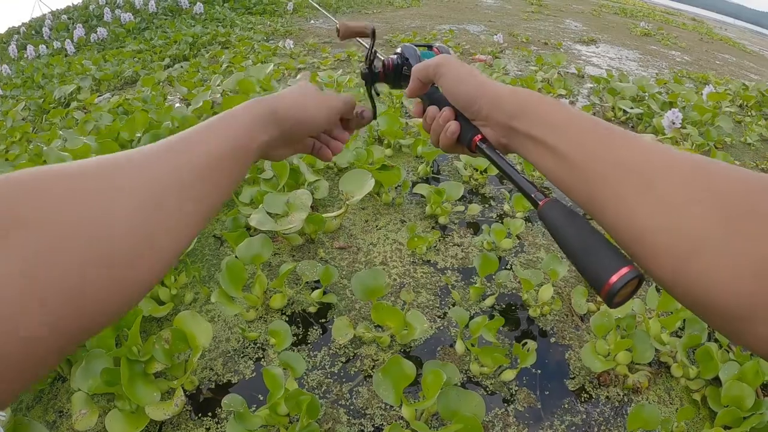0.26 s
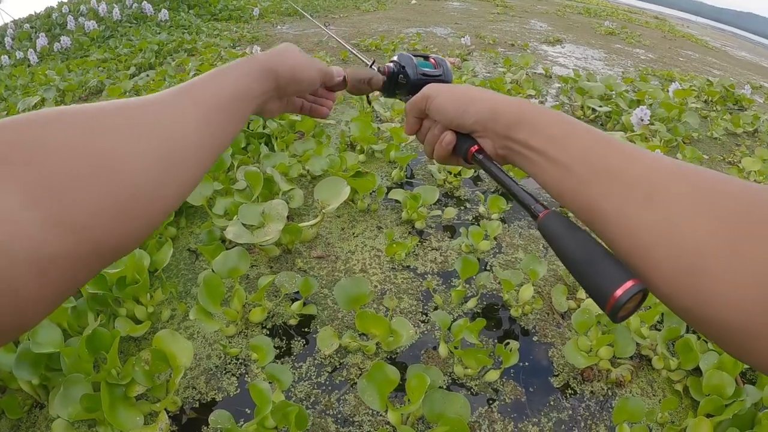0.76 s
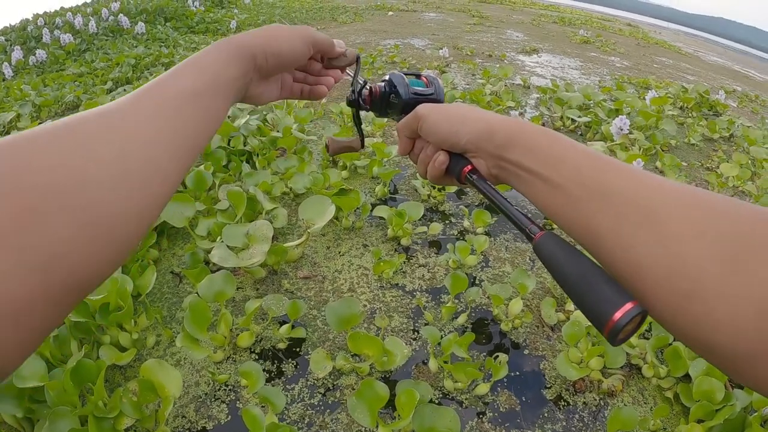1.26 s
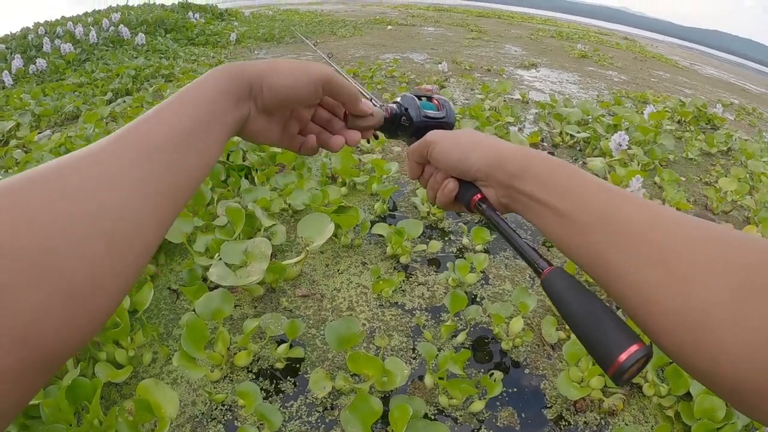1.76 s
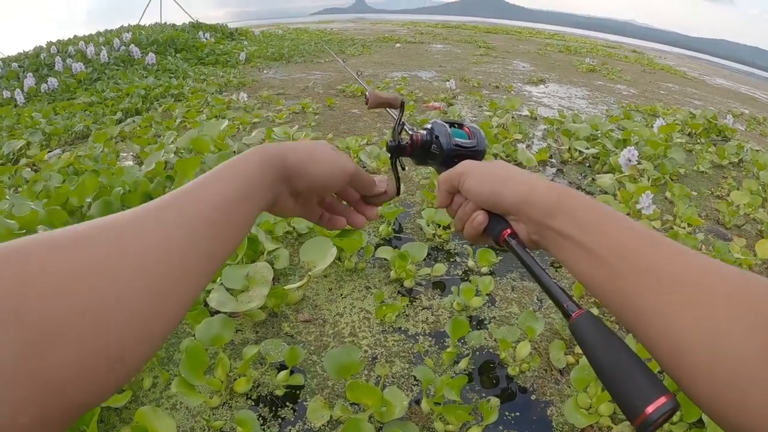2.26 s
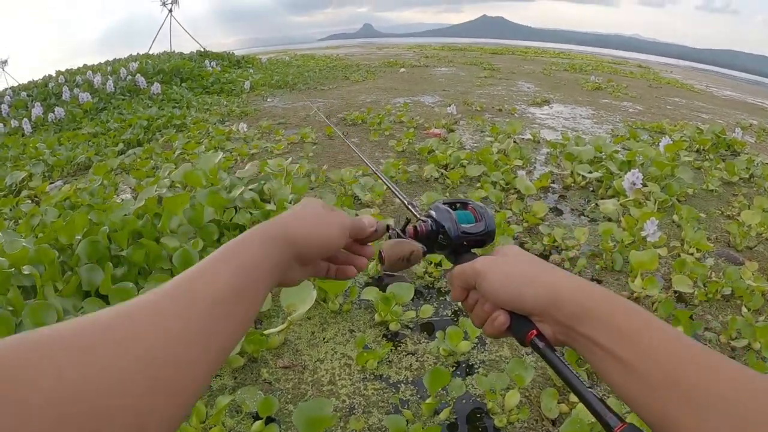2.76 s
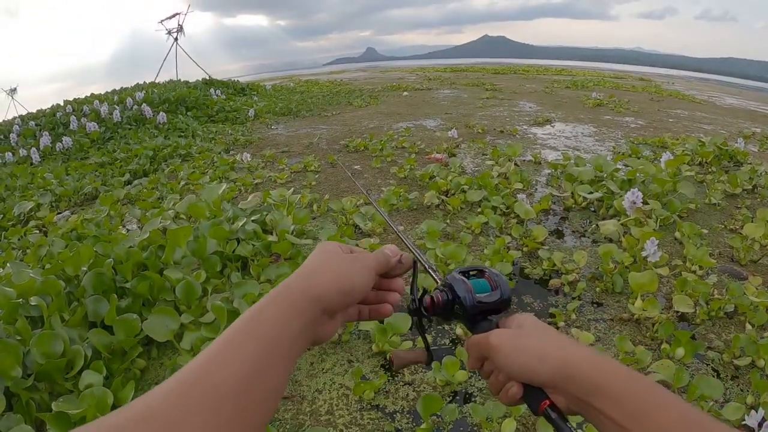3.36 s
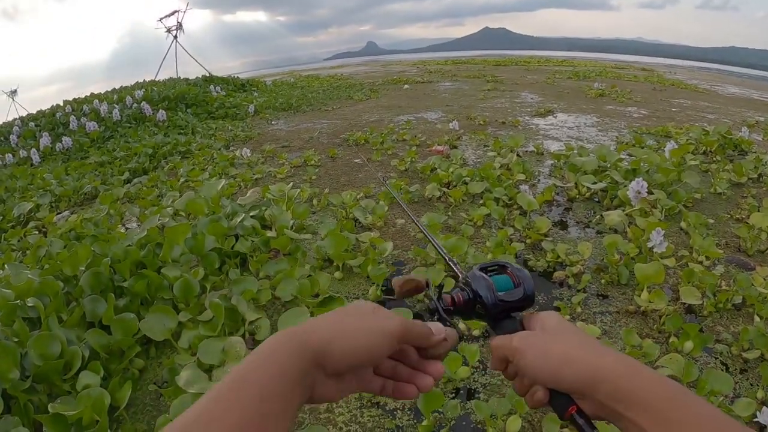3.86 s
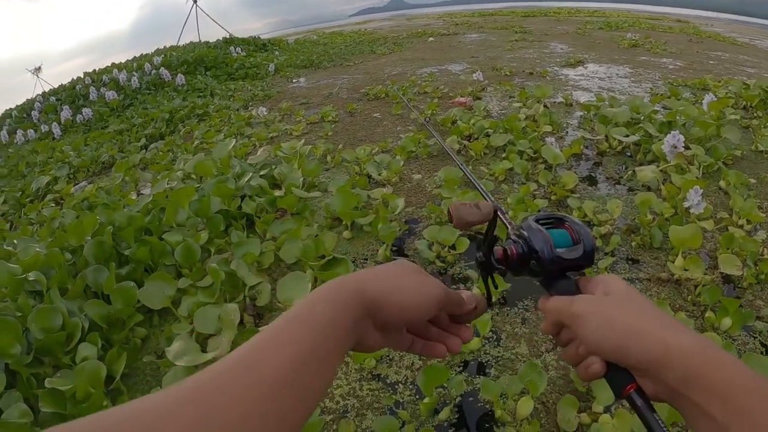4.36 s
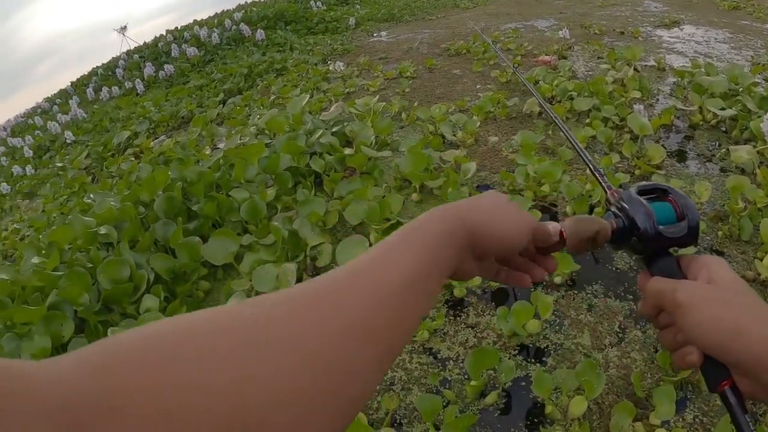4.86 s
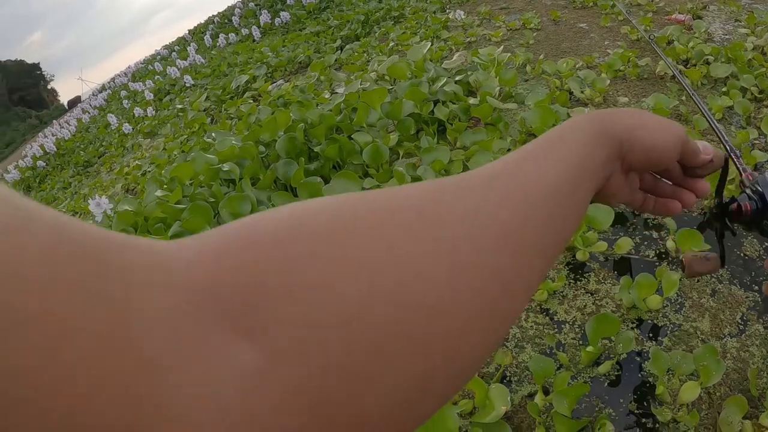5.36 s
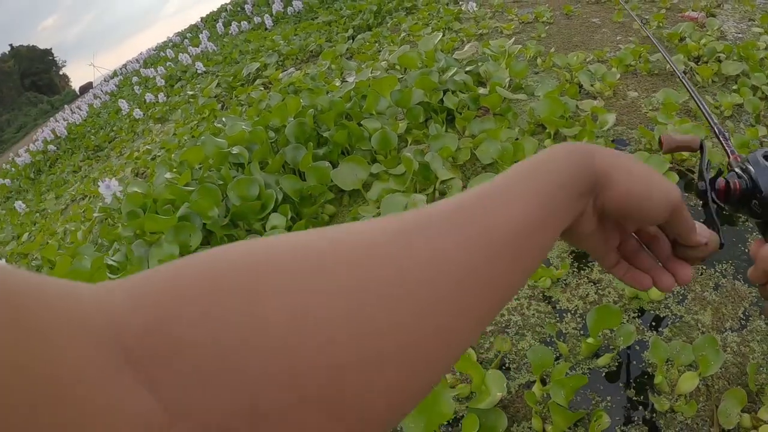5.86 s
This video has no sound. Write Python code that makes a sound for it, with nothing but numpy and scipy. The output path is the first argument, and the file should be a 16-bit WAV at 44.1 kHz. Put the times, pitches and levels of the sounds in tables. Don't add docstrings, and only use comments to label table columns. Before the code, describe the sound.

A weedy lake shore in open air, heard in stereo from a small chest-worn camera. Throughout, a shimmering cricket chorus around 7 to 8 kHz leans left, with a lower insect trill, a faint airy hiss, a far engine's low drone and light breeze. From 0 to 1.6 s hoarse birds chatter, with sharp brief calls near 0.7, 1.15 and 1.5 s. Sparse reel ticks and tiny drips begin around 0.5 s. More bird chatter fills 2 to 3 s, as a closer cricket pulses more clearly. The chorus swells briefly at 3.25 s; thin whistles slide downward on the right from 3.4 to 4.4 s. After 4.3 s close wet snaps, reel clicks, line scrapes and leaf and cloth rustle come thickly, easing briefly around 5.3 s, then peaking with plinking drops near 5.9 to 6.1 s as crickets rise.

```python
import sys
import numpy as np
from scipy import signal
from scipy.fft import rfft, irfft, next_fast_len
from scipy.io import wavfile
from scipy.ndimage import uniform_filter1d

SR = 44100
rng = np.random.default_rng(int(sys.argv[2]) if len(sys.argv) > 2 else 0)


def store_wav(level_fs):
    pcm = np.round(np.clip(np.atleast_2d(level_fs), -1, 1) * 32767)
    wavfile.write(sys.argv[1], SR, pcm.T.astype(np.int16))


def magnitude_from_level(level_db):
    exponent = np.asarray(level_db, float) / 20
    return 10 ** exponent


N = 269936


def evened(x):
    return x / np.sqrt(np.mean(x ** 2) + 1e-20)


def read(points, hz):
    f, value = np.transpose(points)
    return np.interp(np.log(hz + 1), np.log(f + 1), value)


def curve(rows):
    s, *columns = np.transpose(rows)
    return [np.interp(np.arange(N) / SR, s, c) for c in columns]


def add(mix, s, sound):
    part = mix[..., round(s * SR):][..., :sound.shape[-1]]
    part += sound[..., :part.shape[-1]]


def placed(x, pan_db):
    return x * magnitude_from_level(np.array([[pan_db / 2], [-pan_db / 2]]))


def drift(rate_hz, length):
    steps = int(length / SR * rate_hz) + 3
    return np.interp(np.arange(length) / SR * rate_hz, np.arange(steps), rng.standard_normal(steps))


def ring(x, hz, width):
    r = np.exp(-np.pi * width / SR)
    pole = r * np.exp(2j * np.pi * hz / SR)
    return 2 * signal.lfilter([(1 - r) ** 2], [1, -2 * pole, pole ** 2], x).real


def resonate(x, hz, width):
    turn = np.exp(2j * np.pi * np.cumsum(hz * np.ones(len(x))) / SR)
    r = np.exp(-np.pi * width / SR)
    return 2 * (turn * signal.lfilter([(1 - r) ** 2], [1, -2 * r, r * r], x / turn)).real


def outdoors(x, t60, start_s=0.0067):
    t = np.arange(SR // 2) / SR
    taps = rng.choice([-1., 1.], (2, len(t))) * (rng.random((2, len(t))) < .05)
    taps = taps * (t > start_s) * magnitude_from_level(-60 * t / t60)
    return signal.fftconvolve(x[None], taps / np.linalg.norm(taps[0]), axes=1)[:, :N]


# pitch in Hz, left minus right in dB.
NOISE_LEAN = [(60, 2.5), (160, -0.5), (440, -0.5), (1200, 0.5), (3260, 3.5), (8850, -4)]


def hiss(colour, patchy_db, likeness):
    frames, hz = N // 256 + 5, np.fft.rfftfreq(1024, 1 / SR)
    a, b, c, d, patches = rng.standard_normal((frames, 513, 5)).T
    patches = evened(uniform_filter1d(uniform_filter1d(patches, size=12, axis=0), size=10, axis=1))
    same = np.clip(read(likeness, hz), 0, 1)[:, None]
    left = a + 1j * b
    right = same * left + np.sqrt(1 - same ** 2) * (c + 1j * d)
    right = right * magnitude_from_level(-read(NOISE_LEAN, hz))[:, None]
    z = np.array([left, right]) * magnitude_from_level(read(colour, hz)[:, None] + patchy_db * patches)
    return evened(signal.istft(z, nperseg=1024, noverlap=768)[1][:, :N])


def wing(gate, hz, width, strokes_hz):
    stroke = .5 + .5 * np.cos(2 * np.pi * (np.arange(N) * strokes_hz / SR + rng.random()))
    return evened(ring(gate * (0.48 + stroke) * rng.standard_normal(N), hz, width))


# time in seconds, level in dB.
CHORUS_LEVEL = [
    (0, -61),
    (1.1, -60.5),
    (2.3, -59.5),
    (2.9, -59),
    (3.25, -54),
    (3.5, -59.5),
    (5.6, -61),
    (6.12, -54.5),
]
# wing pitch in Hz, ring width in Hz, chirps per second, level in dB,
# left minus right in dB.
CHORUS_SINGERS = [(6760, 210, 4.7, -4.5, 7.5), (6930, 210, 7.9, -3, 18.5), (7103, 130, 5.7, -3.5, 12),
                  (7200, 190, 8.6, -2.5, 11), (7360, 130, 19, -4.5, 16), (7556, 150, 6.8, -3, 11),
                  (7764, 130, 15, -10, 17), (7930, 130, 7.2, -21, -3), (8030, 78, 3.9, -15.5, 9.5)]
# time in seconds, level
# in dB.
MIDDLE_SINGERS_LEVEL = [(0, -1), (3.2, -1), (3.5, -0.5), (6.12, -3)]


def cricket_chorus():
    near, far = np.zeros((2, N)), np.zeros(N)
    middle_db = curve(MIDDLE_SINGERS_LEVEL)[0]
    for hz, width, chirps, db, pan_db in CHORUS_SINGERS:
        beat = np.arange(N) * chirps / SR + rng.random() + 0.23 * drift(1.5, N)
        gate = np.clip(0.52 + 1.2 * np.sin(2 * np.pi * beat), .25, 1)
        fade_db = middle_db * (7080 < hz < 7500)
        level = magnitude_from_level(db + fade_db + 2.24 * drift(1.2, N))
        song = level * wing(gate, hz, width, rng.uniform(110, 145))
        near += placed(song, pan_db)
        far += song
    scale = magnitude_from_level(curve(CHORUS_LEVEL)[0] - 3.5) / np.std(far)
    return scale * (near + magnitude_from_level(-17.5) * outdoors(far, t60=0.29))


# time in seconds, level in dB.
NEAR_CRICKET_LEVEL = [(0, -84), (1.5, -79), (2.2, -69), (3.3, -66.5), (4.2, -65.5), (5.3, -64), (6.12, -86)]


def near_cricket():
    first_s, spacing_s, chirp_s = .045, .1393, .075
    since = (np.arange(N) / SR - first_s) % spacing_s
    gate = np.clip(np.minimum(since, chirp_s - since) / 0.0095, 0, 1)
    song = magnitude_from_level(curve(NEAR_CRICKET_LEVEL)[0] - 2.5) * wing(gate, 7590, 150, 125)
    return placed(song, 16.0) + magnitude_from_level(-6.5) * outdoors(song, t60=0.16)


# time in seconds, level in dB.
LOW_INSECT_LEVEL = [(0, -76), (.5, -74), (1.4, -73), (2.2, -80), (3, -73.5), (4, -81), (6.12, -66)]


def low_insect():
    gate = magnitude_from_level(4.1 * drift(15, N))
    song = wing(gate, 3860, 190, 60) + magnitude_from_level(-1.5) * wing(gate, 3620, 150, 73)
    return placed(magnitude_from_level(curve(LOW_INSECT_LEVEL)[0]) * song, 1.8)


def bird_note(length, level_db, pitches, rough, buzz_hz, wobble_hz, width):
    t = np.arange(0, length, 1 / SR)
    hz = np.interp(t, np.linspace(0, length, len(pitches)), pitches)
    buzz = np.sin(2 * np.pi * buzz_hz * t + 0.49 * drift(55, len(t)))
    clear = np.sin(2 * np.pi * np.cumsum(hz + wobble_hz * buzz) / SR)
    clear = clear * (1 - rough * buzz)
    breath = resonate(rng.standard_normal(len(t)), hz, width)
    voice = (1 - rough) * evened(clear) + rough * evened(breath)
    return magnitude_from_level(level_db) * evened(voice) * signal.windows.tukey(len(t), 0.34)


# start in seconds, length in seconds, level in dB,
# middle pitch in Hz, glide from start to end in Hz.
ARCHED_NOTES = [(.118, 0.071, -57, 2600, 405), (.13, 0.032, -63, 2950, 101),
                (.19, 0.032, -63.5, 2050, -200), (.172, 0.041, -55, 2400, -750),
                (.449, 0.12, -64.5, 2475, -500), (.6, 0.046, -62, 2450, 102), (.635, 0.028, -62, 2900, 102),
                (.655, .028, -61, 3230, 50), (.73, 0.023, -69, 2980, 203), (.81, 0.071, -57, 2446, -360),
                (.885, 0.099, -51.5, 2160, 252), (.893, 0.052, -52.5, 2570, -150),
                (.94, 0.026, -58, 2830, 51), (1.04, .06, -57.5, 2490, 130), (1.24, 0.044, -58, 2434, -150),
                (2.1, 0.1, -57, 2640, 400), (2.145, 0.043, -58.5, 3000, 30), (2.215, 0.057, -55, 2610, 194),
                (2.338, 0.048, -55.5, 2740, -650), (2.375, 0.044, -51, 2970, -150),
                (2.39, 0.042, -54, 2480, 698), (2.555, 0.073, -53, 2757, 101),
                (2.63, 0.068, -56.5, 2740, 300), (2.698, .075, -55, 2590, 298),
                (2.724, 0.02, -54, 3290, 100), (2.79, 0.097, -52.5, 2750, 146), (2.889, .05, -57, 2740, 25),
                (2.94, 0.052, -51, 2785, 253), (3.055, 0.055, -65.5, 2760, 53),
                (3.249, 0.13, -60, 2616, -190), (3.601, 0.07, -63, 2820, 552),
                (4.41, 0.064, -72, 2280, 150), (5.245, .03, -66, 2800, 50), (5.278, 0.043, -64, 3400, -200),
                (5.3, 0.067, -57.5, 2780, -100)]
# start in seconds, length in seconds,
# level in dB, middle pitch in Hz, glide from start to end in Hz.
SCOOPED_NOTES = [(2.03, 0.057, -64, 1440, -48), (2.13, 0.098, -66, 2290, 47),
                 (2.35, 0.058, -57.5, 2150, 50), (2.59, 0.047, -57, 2220, 30), (1.76, 0.16, -65, 2305, 6),
                 (3.43, 0.047, -66, 1367, -510), (3.7, 0.078, -65.5, 1950, -410),
                 (3.98, .1, -60.5, 2167, -92), (4.15, 0.11, -59.5, 1990, -100),
                 (4.335, .085, -53.5, 2120, -150)]
# main note's start in seconds, its length in seconds, level in dB,
# pitch in Hz.
NEAR_CALLS = [
    (0.672, 0.033, -49, 2786),
    (1.149, 0.037, -37, 2797),
    (1.535, .053, -41.5, 2730),
]
MAIN_NOTE_SAG = (39.8, 0, 90)


def reed_notes():
    notes = []
    for rows, bend in ((ARCHED_NOTES, 190.8), (SCOOPED_NOTES, -230)):
        for s, length, db, hz, glide in rows:
            notes.append((s, length, db, (hz - bend - glide / 2, hz, hz - bend + glide / 2)))
    lead_s, tail_s = 0.021, 0.047
    for s, length, db, hz in NEAR_CALLS:
        notes.append((s - lead_s, lead_s, db - 18, (1920, 2120, 2220)))
        notes.append((s, length, db, hz - np.array(MAIN_NOTE_SAG)))
        notes.append((s + 0.85 * length, tail_s, db - 13, (2282, 1990, 1960)))
    return notes


def reed_birds():
    reed = np.zeros(N)
    for s, length, db, pitches in reed_notes():
        rough = np.clip(0.37 + 0.011 * (-39 - db), 0, .9)
        add(reed, s, bird_note(length, db, pitches, rough, buzz_hz=201.2, wobble_hz=75.5, width=340))
    return placed(reed, 5.4) + magnitude_from_level(-6.5) * outdoors(reed, t60=.3)


# start in seconds, level in dB, starting pitch in Hz, length in seconds,
# depth of the fall (1 = the full shape below).
WHISTLES = [
    (3.437, -68, 8750, 0.096, 0.63),
    (3.677, -58.5, 8870, 0.12, 1.02),
    (3.891, -57.5, 8870, 0.1, 1.17),
    (4.085, -58, 9170, .1, 1.5),
    (4.329, -55.5, 8610, 0.13, 0.97),
]
WHISTLE_FALL = (0, 480, 580, 620, 660, 720, 800, 1000)


def falling_whistle():
    thin = np.zeros(N)
    for s, db, hz, length, depth in WHISTLES:
        pitches = hz - depth * np.array(WHISTLE_FALL)
        add(thin, s, bird_note(length, db, pitches, rough=0.3, buzz_hz=92.5, wobble_hz=45, width=240))
    return placed(thin, -4.0) + magnitude_from_level(np.array([[-4], [0.5]])) * outdoors(thin, t60=0.49)


# pitch in Hz, width in Hz, level in dB.
REEL_BODY = [(3570, 2680, -2.5), (4780, 4300, -4), (9200, 4000, -31), (12800, 3000, -25.5)]


def reel_body(bright, dull):
    high = sum(magnitude_from_level(db) * ring(bright, hz, w) for hz, w, db in REEL_BODY)
    near = magnitude_from_level(2.0) * high + magnitude_from_level(6.5) * ring(dull, 1710, 1270)
    return placed(near, 1.8) + magnitude_from_level(-11.5) * outdoors(near, t60=0.017, start_s=0.00047)


# start in seconds, peak in dB, low part in dB against the peak.
REEL_TICKS = [(0.51, -52, -9), (1.1823, -41.5, -18), (1.712, -52, -15), (1.946, -45, -17), (2.214, -40, -4),
              (2.2694, -42.5, -29), (2.5057, -40, -3), (2.696, -58.5, 18), (2.966, -49, -5),
              (3.9797, -42, -10), (4.346, -37.5, 1.5), (4.3672, -35.5, 2), (4.535, -37.5, 0),
              (4.6348, -36, -8), (4.681, -43.5, -14), (4.8, -53, -26), (4.908, -44, -21), (4.942, -40, -20),
              (4.99, -47, 1), (5.027, -45.5, 2), (5.119, -40, 1), (5.241, -42, -11), (5.5045, -42, -23),
              (5.531, -51.5, 13), (5.679, -41, -10), (5.813, -49, -21), (5.8847, -39, 2),
              (5.925, -29.5, -4), (5.976, -56, 15), (6.059, -42, 5)]


def reel_ticks():
    bright, dull, t = np.zeros(N), np.zeros(N), np.arange(2000) / SR
    for s, db, low_db in REEL_TICKS:
        fade_db = 26 * t / 0.014
        burst = rng.standard_normal(2000) * magnitude_from_level(db - fade_db) * np.minimum(t / 0.0005, 1)
        burst[8] += 2.8 * magnitude_from_level(db)
        add(bright, s, burst)
        add(dull, s, magnitude_from_level(low_db) * burst)
    return reel_body(bright, dull)


# middle in seconds, level in dB,
# low part in dB against the level, length in seconds.
LINE_SCRAPES = [(1.593, -54, -23, 0.051), (1.723, -54, -24, 0.04), (2.266, -56, 4.5, 0.044),
                (2.925, -57, -7, 0.072), (3.02, -61.5, 7.5, 0.066), (4.591, -53, -8, 0.096),
                (4.796, -53.5, -7, 0.039), (4.975, -51, -13, 0.042), (5.122, -50.5, 2, 0.054),
                (5.247, -52.5, -2, .05), (5.521, -55, -1, 0.081), (5.691, -47, -15, 0.033),
                (5.836, -47, -18, 0.031), (5.943, -44, -4.5, 0.024)]


def line_scrapes():
    bright, dull = np.zeros(N), np.zeros(N)
    for s, db, low_db, length in LINE_SCRAPES:
        shape = np.hanning(round(1.62 * length * SR))
        burst = rng.standard_normal(len(shape)) * shape * magnitude_from_level(db + 3.5 + 2.9 * drift(285, len(shape)))
        add(bright, s - 0.67 * length, burst)
        add(dull, s - 0.81 * length, magnitude_from_level(low_db) * burst)
    return reel_body(bright, dull)


# start in seconds, peak in dB, ringing pitch in Hz.
CRACKLES = [(4.3193, -58, 802), (4.3195, -31.5, 2320), (4.34, -32, 2550), (4.3457, -45, 2420),
            (4.367, -40, 2040), (4.4016, -43, 2220), (4.434, -45, 2220), (4.4656, -39, 3060),
            (4.487, -41, 2840), (4.5343, -28, 2340), (4.5747, -38, 2800), (4.5842, -35, 2070),
            (4.6181, -39, 3850), (4.6329, -35, 1210), (4.658, -36, 3490), (4.68, -42, 2710),
            (4.7239, -41, 2750), (4.7484, -38.5, 1320), (4.7917, -42, 4390), (4.7917, -42, 4390),
            (4.7917, -38, 4130), (4.8216, -35, 2370), (4.884, -33, 2960), (4.9429, -33, 3900),
            (4.976, -36, 1730), (4.984, -33, 1900), (5.0301, -32, 1220), (5.0344, -30, 2900),
            (5.0646, -44, 6850), (5.0884, -36, 1560), (5.118, -32, 4790), (5.119, -35, 1060),
            (5.1604, -38, 1370), (5.1923, -42, 1610), (5.2098, -37, 1610), (5.2262, -37, 1550),
            (5.2322, -38, 1570), (5.2386, -36, 1570), (5.3135, -50, 2680), (5.3455, -47, 2490),
            (5.4288, -47, 1470), (5.4861, -42, 3530), (5.502, -35, 3840), (5.528, -35, 1930),
            (5.643, -48, 1340), (5.666, -44, 1840), (5.669, -45, 1240), (5.6803, -37, 1700),
            (5.732, -37, 1690), (5.7698, -33, 2050), (5.8079, -43, 2330), (5.8309, -52, 802),
            (5.8309, -36, 3250), (5.854, -37, 2600), (5.8847, -38, 1810), (5.927, -29, 3430),
            (5.9368, -24, 3060), (6.009, -30, 915), (6.0618, -25.5, 1250), (6.1093, -31, 1400)]


def crackles():
    out, t = np.zeros(N), np.arange(600) / SR
    for s, db, hz in CRACKLES:
        snap = np.sin(2 * np.pi * hz * t) + 0.31 * rng.standard_normal(600)
        fade_db = 26 * t * hz / 8.4
        add(out, s, magnitude_from_level(db - 7.5 - fade_db) * snap)
    return placed(out, 2.6) + magnitude_from_level(-11.5) * outdoors(out, t60=0.05, start_s=.001)


# middle in seconds, length in seconds, level in dB, pitch in Hz.
LINE_RUBS = [(4.59, 0.038, -56, 1900), (4.794, 0.022, -52.5, 4100), (5.095, 0.037, -53, 1440),
             (5.122, 0.024, -49.5, 1580), (5.125, 0.037, -58, 3820), (5.118, 0.031, -52, 4900),
             (5.237, 0.037, -57, 1540), (5.248, 0.027, -61, 3900), (5.361, .04, -59.5, 3660),
             (5.435, 0.032, -53, 1790), (5.506, 0.026, -47, 3940), (5.531, 0.027, -51, 1700),
             (5.549, 0.029, -45.5, 3320), (5.69, 0.031, -53, 1700), (5.89, 0.045, -49, 1890),
             (5.938, 0.018, -46.5, 4450), (5.831, 0.023, -52, 2980), (5.712, 0.019, -54.5, 3180),
             (4.48, 0.034, -55, 2920), (4.66, 0.017, -53, 3440), (4.698, .05, -60, 2520)]


def line_rubs():
    out = np.zeros(N)
    for s, length, db, hz in LINE_RUBS:
        shape = np.hanning(round(1.38 * length * SR))
        grit = rng.standard_normal(len(shape)) * magnitude_from_level(4.3 * drift(290, len(shape)))
        add(out, s - 0.69 * length, magnitude_from_level(db) * shape * evened(ring(grit, hz, 0.33 * hz)))
    return placed(out, 2.4) + magnitude_from_level(-14) * outdoors(out, t60=.03, start_s=.001)


# start in seconds, peak in dB, bubble pitch in Hz,
# seconds to die by 60 dB.
DRIPS = [(0.754, -44, 1140, 0.015), (1.277, -46, 1610, 0.04), (.895, -44, 2600, 0.013),
         (2.214, -36, 3170, .015), (1.355, -42.5, 1390, 0.024), (2.505, -34.5, 2320, 0.046),
         (2.504, -40, 2650, .025), (5.6, -34, 2400, .006), (4.533, -32, 2270, 0.0091),
         (4.68, -36.5, 2630, 0.019), (5.205, -45, 460, 0.049), (5.934, -25, 2920, 0.017),
         (5.967, -38.5, 850, 0.094), (6.064, -29.5, 1200, 0.054), (6.108, -35, 1350, 0.027)]


def drips():
    out, t = np.zeros(N), np.arange(4000) / SR
    for s, db, hz, t60 in DRIPS:
        rising_t = t + 2.0 * t ** 2 * 1100 / hz
        bubble = np.sin(2 * np.pi * hz * rising_t) * np.minimum(t / 0.0013, 1)
        add(out, s, magnitude_from_level(db - 60 * t / t60) * bubble)
    return placed(out, 3.4)


# time in seconds, level in dB.
RUSTLE_LEVEL = [(0, -67), (1.12, -57.5), (2.0, -59.5), (2.7, -55), (3.7, -63.5), (4.3, -56), (4.52, -47.5),
                (4.86, -54.5), (5.07, -49), (5.22, -57.5), (5.37, -48.5), (5.52, -43.5), (5.63, -53),
                (5.76, -48), (6.04, -38.5), (6.12, -45.5)]
# pitch in Hz, level in dB per Hz.
RUSTLE_COLOUR = [(300, -48), (500, -16), (800, -8), (1300, -0.5), (3000, 2), (5800, -10.5), (7500, -15),
                 (8600, -20), (10000, -23), (13000, -23.5), (15500, -29), (17000, -84)]
# pitch in Hz, likeness from 0 to 1.
RUSTLE_LIKENESS = [(500, 0.92), (2000, 0.91), (5000, 0.7), (10000, .3)]


def rustle():
    level_db = curve(RUSTLE_LEVEL)[0]
    bright_db = 0.5 + 1.5 * drift(4.5, N)
    size = magnitude_from_level(3.2 * np.minimum(rng.exponential(1, N), 3.2))
    hits = size * (rng.random(N) < 1300 / SR)
    grains = signal.lfilter([1], [1, -np.exp(-1 / (0.00062 * SR))], hits)
    noise = hiss(RUSTLE_COLOUR, 2.73, RUSTLE_LIKENESS)
    leaves = evened(noise * (1.47 + grains) * magnitude_from_level(1.0 * drift(30, N)))
    top = signal.sosfilt(signal.butter(2, 4000, "high", fs=SR, output="sos"), leaves)
    return magnitude_from_level(level_db - 4.0) * (leaves + (magnitude_from_level(bright_db) - 1) * top)


# multiple of the firing rate, level in dB.
ENGINE_TONES = [(1, -31), (2, -5), (3, -25), (4, -3.5), (5, -0.5), (6, 4), (7, -6.5), (8, -24), (9, -34),
                (10, -9), (11, -23.5), (12, -7), (13, -14), (14, -12.5), (15, -29), (16, -16.5), (17, -34),
                (18, -26.5), (19, -33), (20, -26)]
# time in seconds, level in dB,
# extra dB on the multiples above 7.
ENGINE_DRONE = [(0.0, -55, 7), (0.17, -46.5, 1), (0.37, -52, 5.3), (0.53, -46, 0.7), (1.76, -49.5, 1.3),
                (1.96, -45, 0.7), (1.99, -50.5, -1), (2.74, -45.5, -3.4), (4.14, -47, -3.5),
                (4.5, -52.5, 3), (4.53, -43.5, -3), (4.64, -54.5, 0.5), (4.82, -46, -5.5),
                (6.12, -56.5, -4)]
# time in seconds, level in dB.
RUMBLE_LEVEL = [(0, -51), (.4, -52), (.75, -50.5), (2.2, -53), (2.9, -50.5), (4.2, -51.5), (6.12, -54)]
# pitch in Hz, level in dB per Hz.
RUMBLE_COLOUR = [(20, -25), (35, -12.5), (62, 0), (100, -3.5), (170, -3.5), (260, -12.5), (450, -20),
                 (800, -54)]
# pitch in Hz, likeness from 0 to 1.
FAR_LIKENESS = [(60, 0.99), (140, 0.96), (320, 0.87), (730, 0.98), (1670, 0.24), (3850, 0.16), (8850, 0.78)]


def far_engine():
    turns = np.arange(N) * 172.3 / SR / 6
    level_db, upper_db = curve(ENGINE_DRONE)
    tones = np.zeros(N)
    for k, db in ENGINE_TONES:
        level = magnitude_from_level(db + upper_db * (k > 7) + 1.9 * drift(2.64, N))
        tones += level * np.cos(2 * np.pi * k * turns + .4 * drift(2.97, N))
    chug = 1 + 0.13 * np.cos(2 * np.pi * turns)
    gusts_db = 1.0 * drift(7.0, N)
    rumble_level = magnitude_from_level(curve(RUMBLE_LEVEL)[0] + 2.5 + gusts_db)
    rumble = rumble_level * chug * hiss(RUMBLE_COLOUR, 0.99, FAR_LIKENESS)
    return magnitude_from_level(level_db - 1.5) * evened(tones) + rumble


def breeze():
    push = ring(rng.standard_normal(N), 60, 45) * magnitude_from_level(4.5 * drift(6.0, N))
    return placed(magnitude_from_level(-59) * evened(push), .8)


# pitch in Hz, level in dB per Hz.
AIR_COLOUR = [(290, -38.5), (500, 6.5), (856, -7.5), (2330, 0), (3330, -9.5), (3720, -5), (5910, -18),
              (6290, -11), (6770, -6.5), (7110, -14), (7840, -1.5), (8430, -27.5), (9300, -54),
              (12100, -79.5), (20500, -120)]


def open_air():
    return magnitude_from_level(-63.5) * hiss(AIR_COLOUR, 2.66, FAR_LIKENESS)


def scene():
    insects = cricket_chorus() + near_cricket() + low_insect()
    birds = reed_birds() + falling_whistle()
    fishing = reel_ticks() + line_scrapes() + crackles() + line_rubs() + drips() + rustle()
    return insects + birds + fishing + far_engine() + breeze() + open_air()


# pitch in Hz, limit in dB per bin.
FAINTEST_KEPT = [(8200, -130), (8600, -116), (11800, -119), (12400, -111), (14500, -109), (16000, -104)]


def drop_faint(x):
    window = np.sin(np.pi * (np.arange(2048) + .5) / 2048)
    hz, _, z = signal.stft(x, SR, window, nperseg=2048, noverlap=1024)
    power = (abs(z) ** 2).mean(axis=0)
    bands = power[:1024].reshape(64, 16, -1).mean(axis=1).repeat(16, axis=0)
    masker = power[(hz > 7600) & (hz < 8600)].mean(axis=0)
    hidden = magnitude_from_level(2 * -29.5) * masker * (hz > 8600)[:, None]
    limit = magnitude_from_level(2 * read(FAINTEST_KEPT, hz))[:, None] + hidden
    z[:, :1024] *= bands > limit[:1024]
    return signal.istft(z, SR, window, nperseg=2048, noverlap=1024)[1][:, :N]


def band_limit(x):
    return signal.sosfilt(signal.butter(12, 15800, fs=SR, output="sos"), x)


# pitch in Hz, level in dB.
OVERALL_COLOUR = [(20, 0.5), (8300, 0), (9000, -6), (12000, -10), (16000, -13.5)]
# pitch in Hz, lag in radians.
LEFT_LAG = [(60, 0.096), (300, 0.11), (800, 0.88), (2400, 0.74), (4300, 1.0), (6400, 1), (9000, 1)]


def record(dry):
    size = next_fast_len(N)
    hz = np.fft.rfftfreq(size, 1 / SR)
    lag = np.exp(-1j * np.outer([1, 0], read(LEFT_LAG, hz)))
    ports = irfft(rfft(dry, size) * lag * magnitude_from_level(read(OVERALL_COLOUR, hz)), size)[:, :N]
    cut = signal.sosfilt(signal.butter(2, 28, "high", fs=SR, output="sos"), ports)
    return band_limit(drop_faint(cut))


dry = scene()
out = record(dry)
store_wav(out)
```